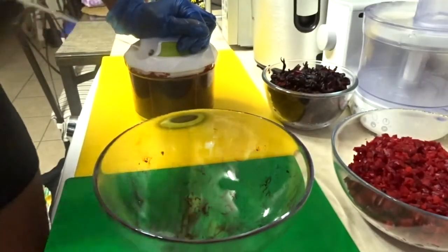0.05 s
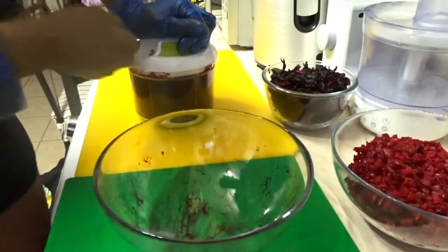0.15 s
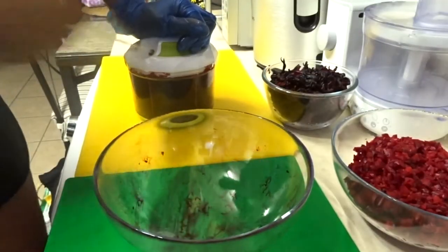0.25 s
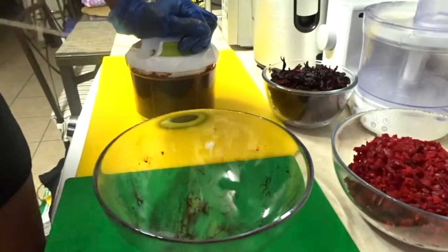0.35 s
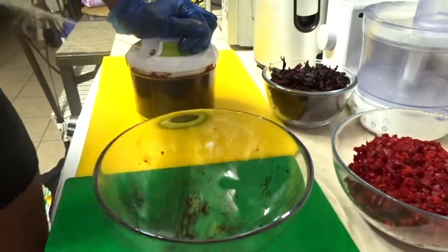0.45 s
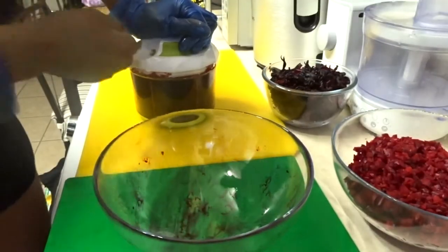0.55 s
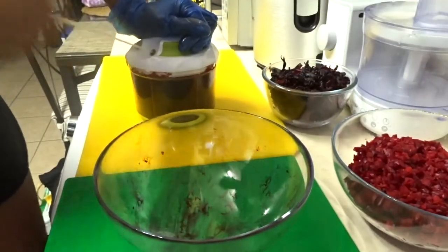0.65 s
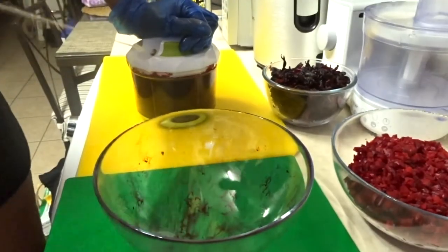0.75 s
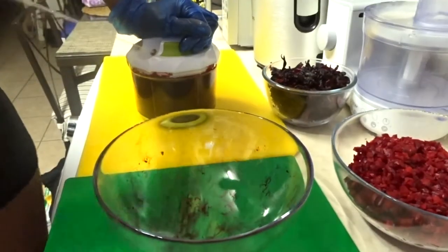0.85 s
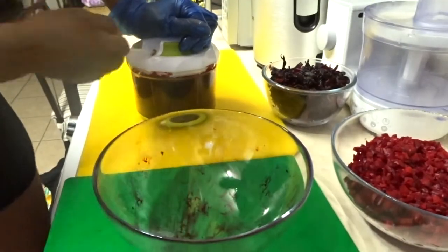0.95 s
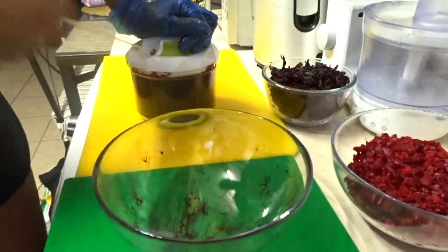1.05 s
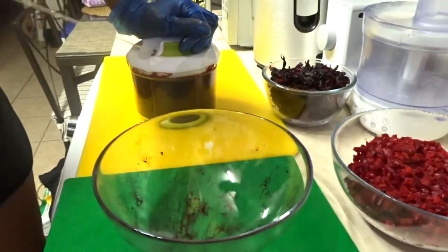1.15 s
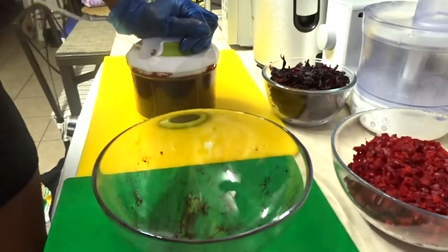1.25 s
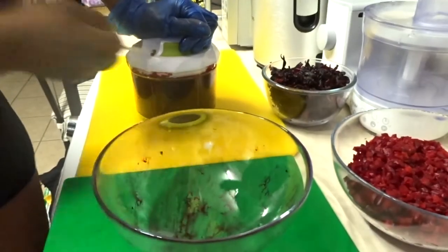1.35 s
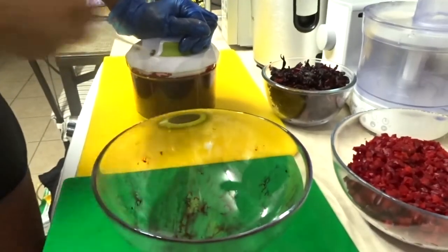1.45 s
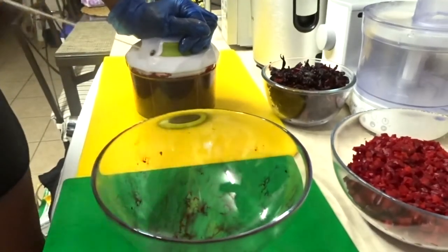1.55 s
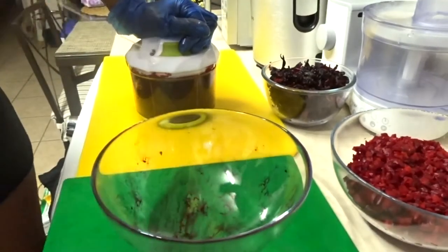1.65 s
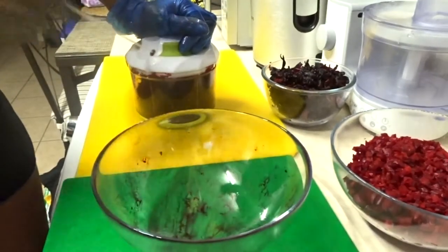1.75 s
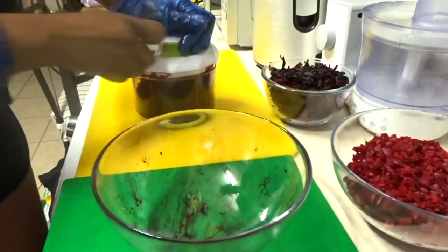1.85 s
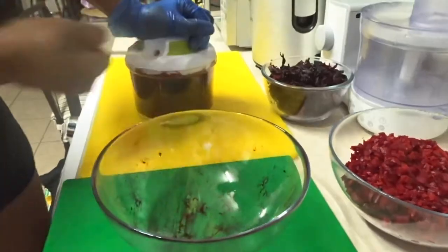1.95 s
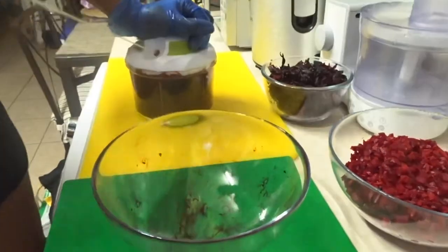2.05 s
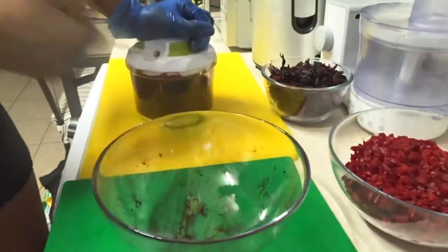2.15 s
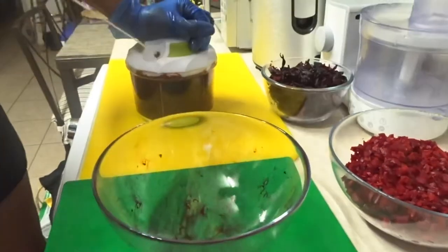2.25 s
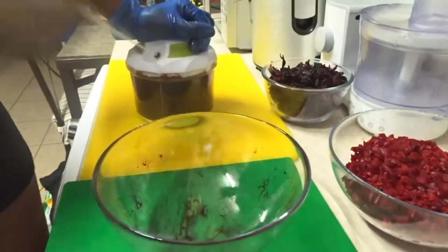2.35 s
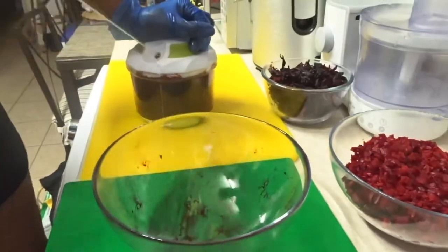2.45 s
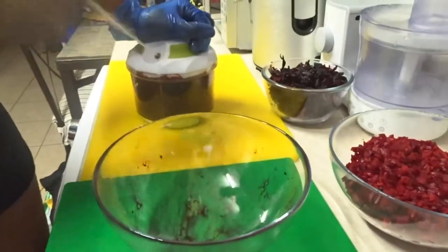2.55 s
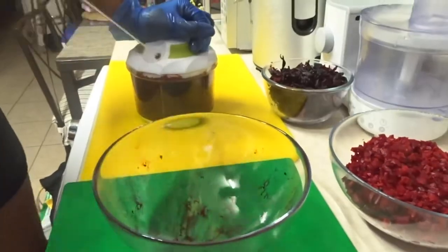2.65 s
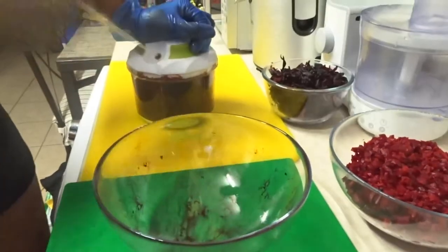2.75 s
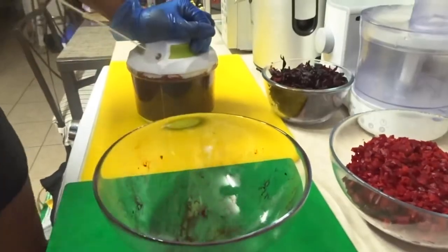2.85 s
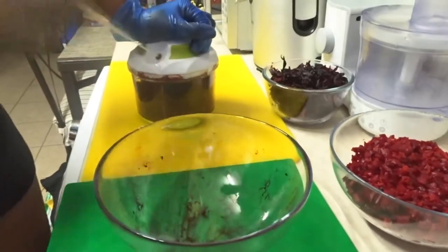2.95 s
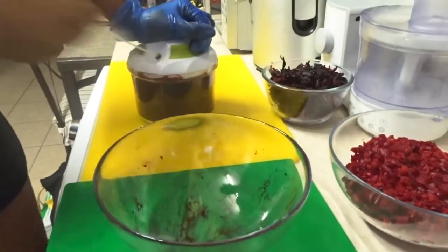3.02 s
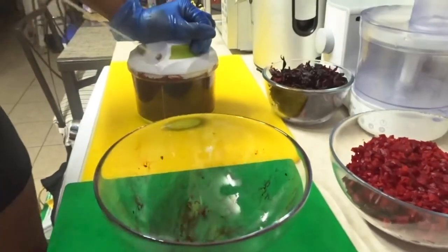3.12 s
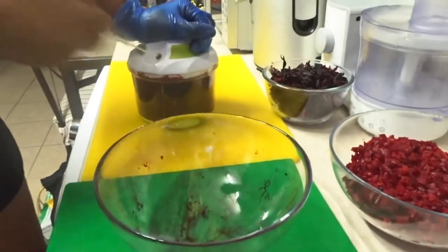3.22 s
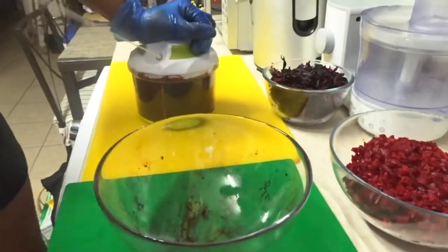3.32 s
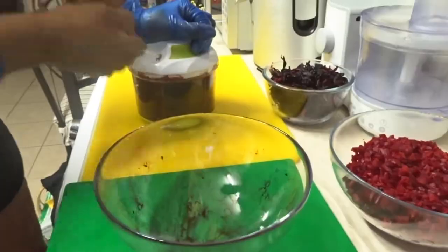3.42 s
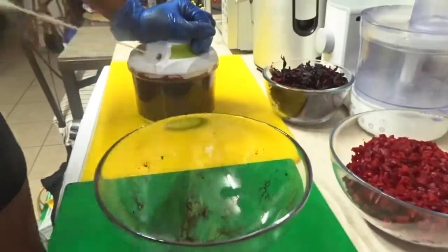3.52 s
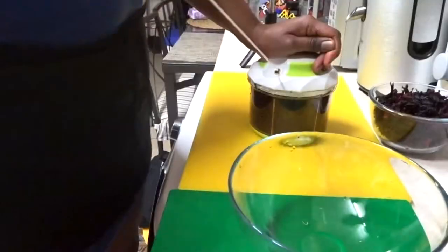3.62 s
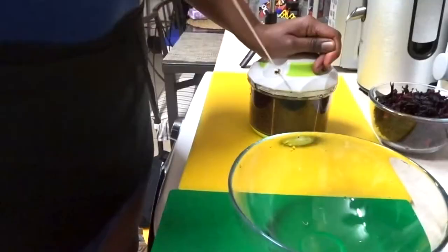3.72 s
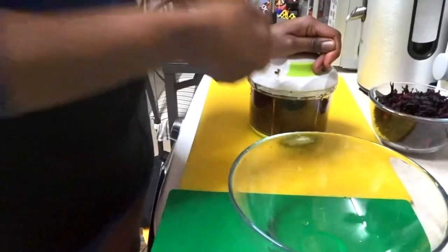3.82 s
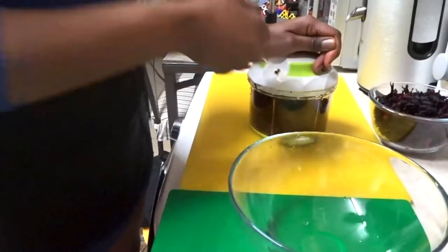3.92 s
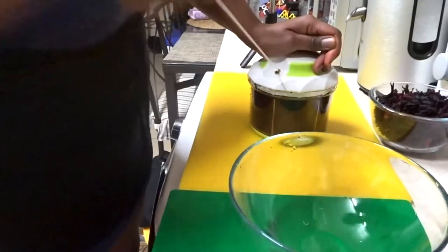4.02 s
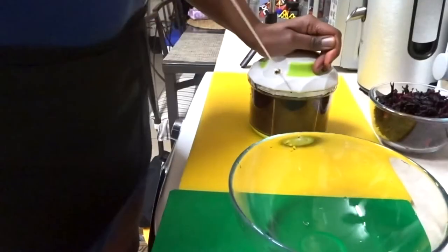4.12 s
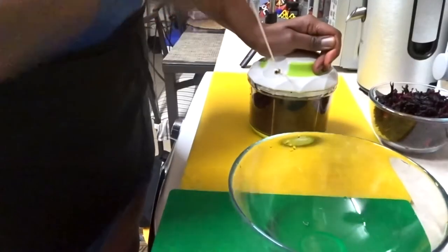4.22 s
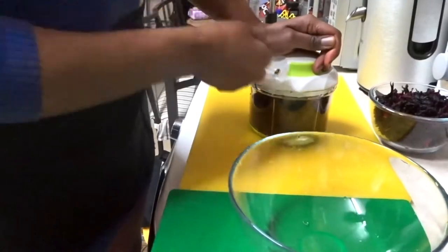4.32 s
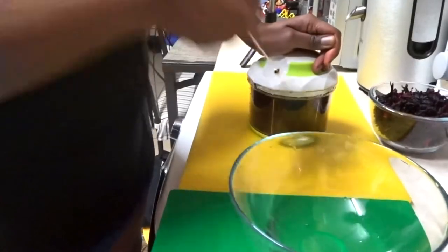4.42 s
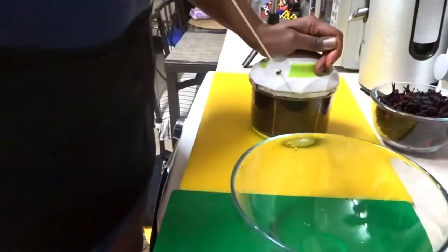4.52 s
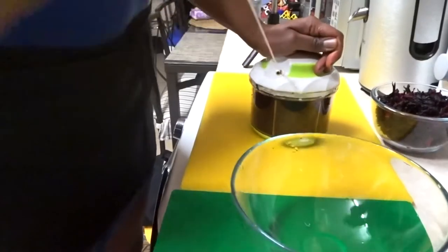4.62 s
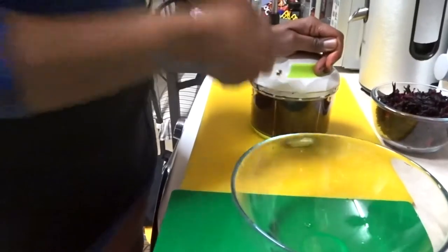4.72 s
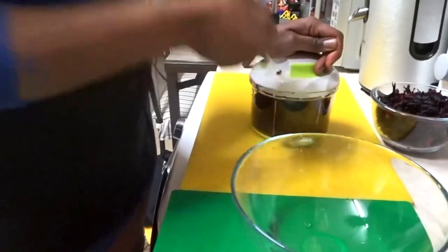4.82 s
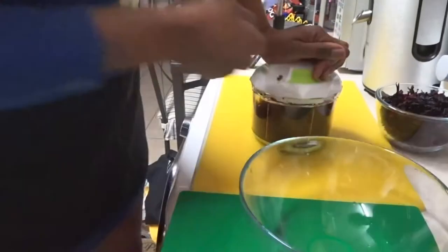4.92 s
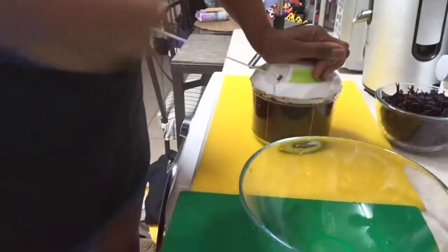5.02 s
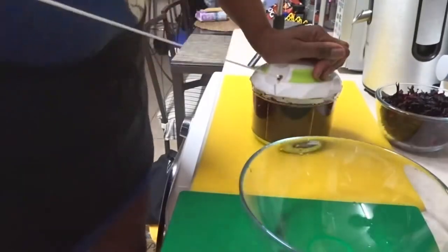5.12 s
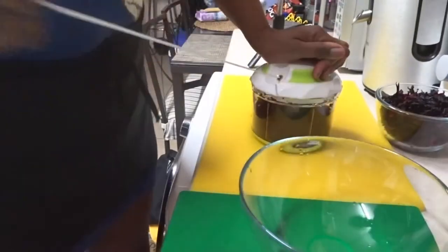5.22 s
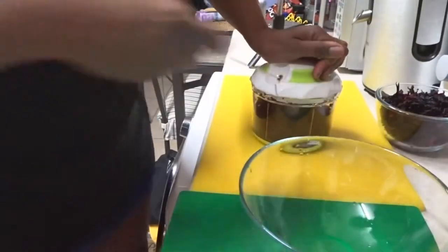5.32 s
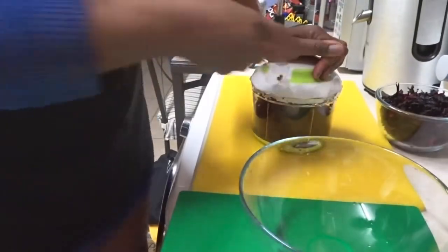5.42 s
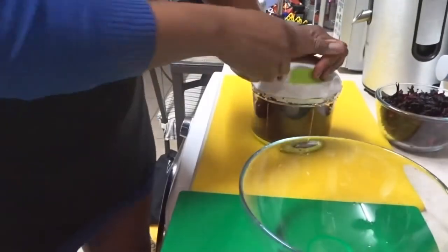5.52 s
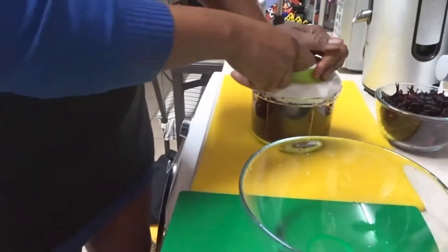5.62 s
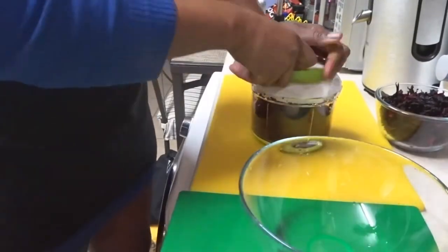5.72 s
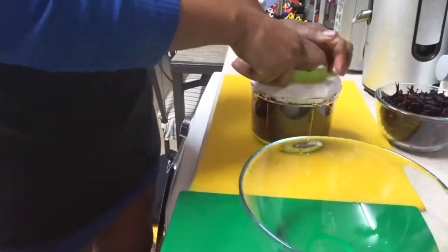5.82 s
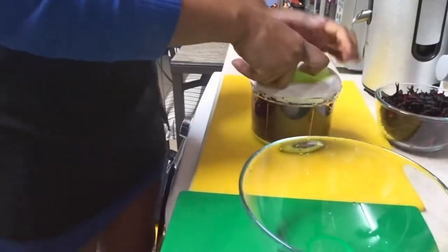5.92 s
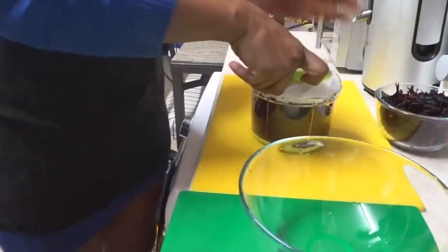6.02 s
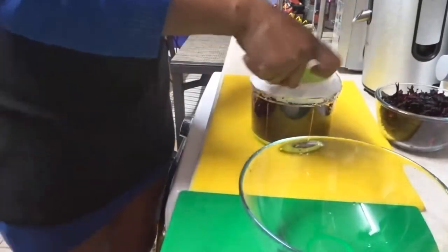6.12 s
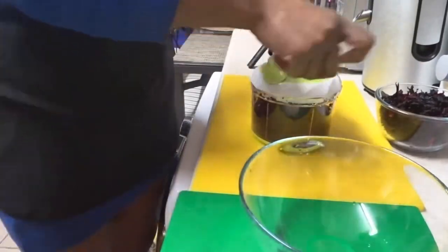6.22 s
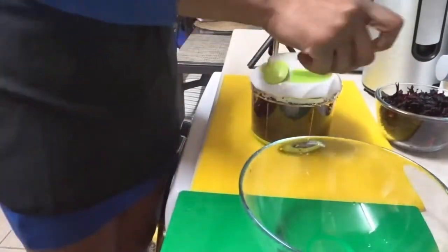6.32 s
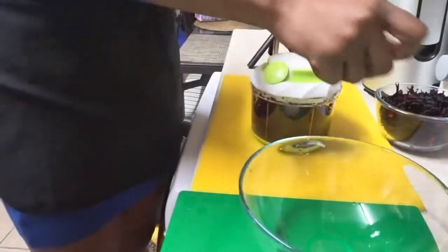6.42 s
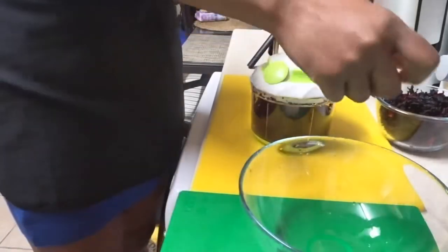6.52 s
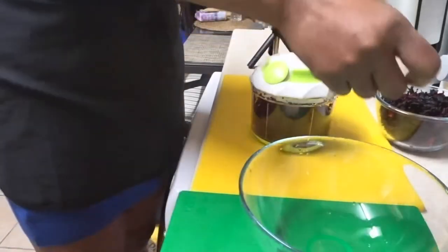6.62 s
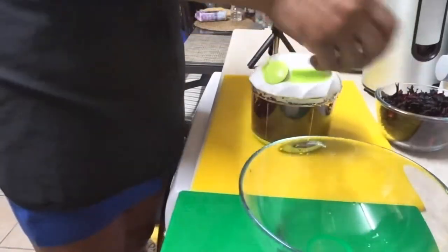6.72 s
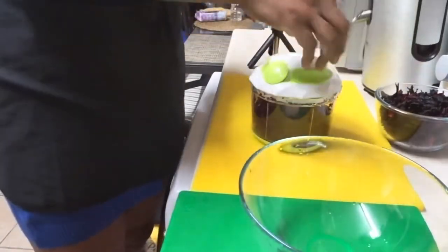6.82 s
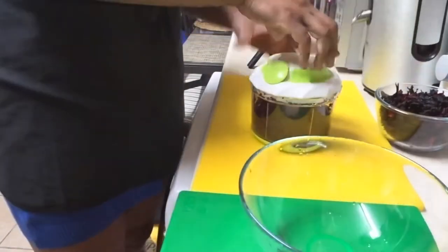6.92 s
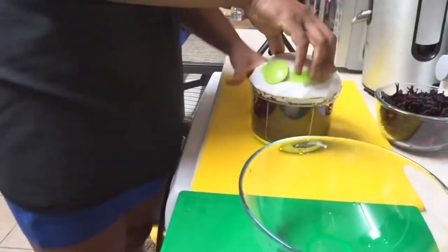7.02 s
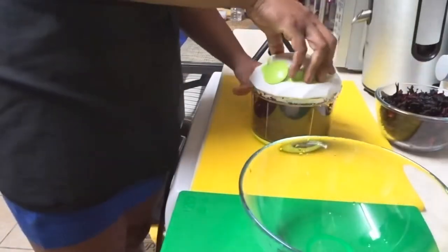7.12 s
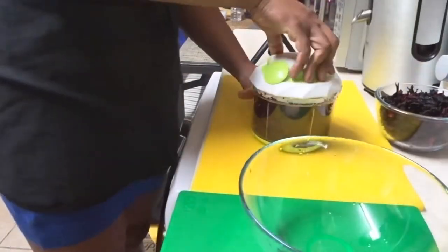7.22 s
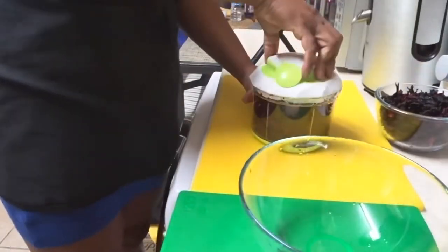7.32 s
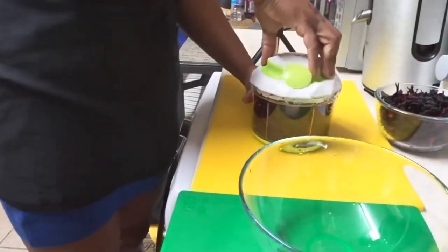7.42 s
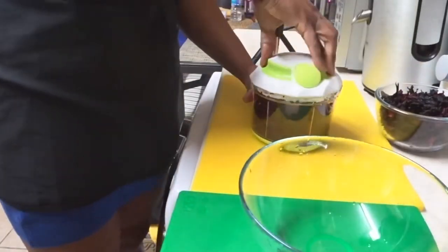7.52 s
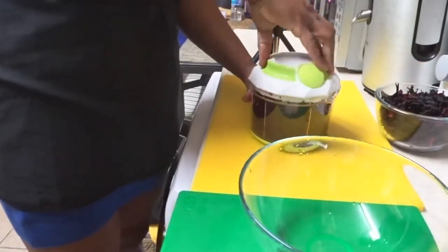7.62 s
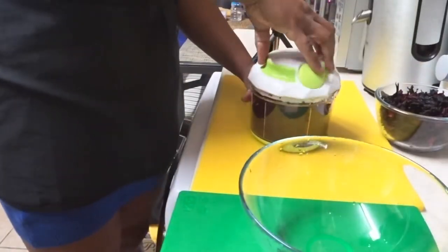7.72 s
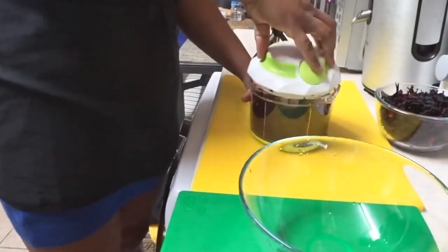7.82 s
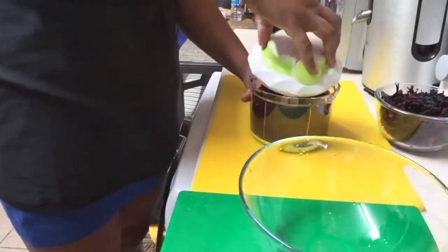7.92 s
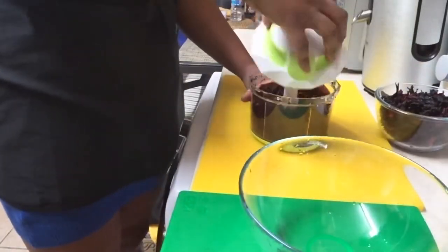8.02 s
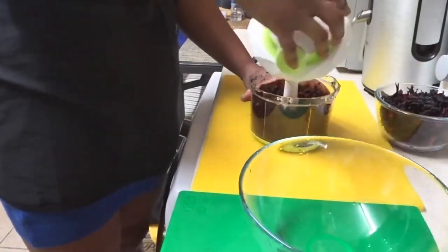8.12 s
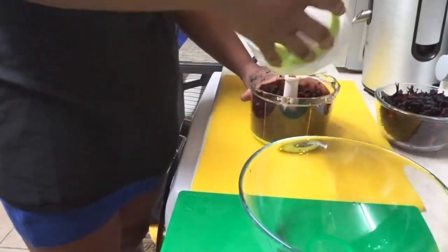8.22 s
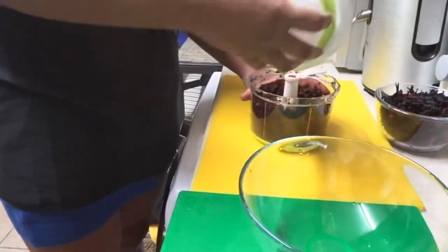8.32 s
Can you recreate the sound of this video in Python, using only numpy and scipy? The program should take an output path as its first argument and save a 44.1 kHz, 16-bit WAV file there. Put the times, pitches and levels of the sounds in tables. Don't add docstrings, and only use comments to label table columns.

```python
import sys
import numpy as np
from scipy import signal
from scipy.fft import rfft, irfft
from scipy.io import wavfile
from scipy.ndimage import uniform_filter1d

SR = 44100
rng = np.random.default_rng(int(sys.argv[2]) if len(sys.argv) > 2 else 0)


def dump_mix(stems):
    frames = np.atleast_2d(stems).T
    limited = np.clip(frames, -1, 1)
    pcm = np.round(limited * 32767).astype(np.int16)
    wavfile.write(sys.argv[1], SR, pcm)


def boost(x):
    u = np.asarray(x, float) / 20
    return 10 ** u


N = 368455
SIZE = 4096
HZ = np.fft.rfftfreq(SIZE, 1 / SR) + 1


def colour(points, modes=()):
    hz, db = np.transpose(points)
    lifts_db = sum(lift / (1 + (2 * (HZ - f) / width) ** 2) for f, width, lift in modes)
    return np.interp(np.log(HZ), np.log(hz), db) + lifts_db


def slope(lo_hz, hi_hz, order=3):
    return -10 * np.log10((1 + (lo_hz / HZ) ** (2 * order)) * (1 + (HZ / hi_hz) ** (2 * order)))


def response(db):
    cepstrum = irfft(db * np.log(10) / 20)
    cepstrum[1:SIZE // 2] *= 2
    cepstrum[SIZE // 2 + 1:] = 0
    return irfft(np.exp(rfft(cepstrum)))[:SIZE // 2]


def ring(x, db):
    return signal.oaconvolve(x, response(db))[:len(x)]


def unit(x):
    return x / np.sqrt(np.mean(x ** 2))


def walk(n, rate_hz):
    hold = int(SR / rate_hz)
    return uniform_filter1d(np.repeat(rng.standard_normal(n // hold + 1), hold)[:n], hold)


# (frequency [Hz], level [dB per Hz])
KITCHEN_HUSH = [(59, -62.5), (100, -35.5), (623, -14.5), (687, -11.5), (1120, -8.5), (2110, -2.5),
                (3060, -8.5), (5210, -9), (11000, -21), (14300, -51), (22000, -120)]
HUSH_DB = -63


def kitchen(n):
    noise = rng.standard_normal((2, n))
    hush = signal.fftconvolve(noise, response(colour(KITCHEN_HUSH))[None], axes=1)[:, :n]
    return boost(HUSH_DB) * unit(hush + 0.26 * hush[::-1])


def walls(t60_s=0.34, treble_t60_s=0.31, wet_db=-11):
    age_s = np.arange(SR // 2) / SR
    noise = rng.standard_normal((2, len(age_s)))
    dull = uniform_filter1d(noise, size=7, axis=1)
    wash = dull * boost(-60 * age_s / t60_s) + (noise - dull) * boost(-60 * age_s / treble_t60_s)
    wash = wash * np.minimum(age_s / 0.01, 1)
    return wash * boost(wet_db) / np.sqrt(np.sum(wash ** 2, axis=1, keepdims=True))


# (frequency [Hz], side minus mid [dB])
SIDE_COLOUR = [(100, -23), (300, -15.5), (700, -14.5), (1500, -8.5), (3000, -3.5), (6000, 3.5), (11000, -1)]


def room(x, wash, wander_hz=120):
    mid, side = signal.fftconvolve(x[None], wash, axes=1)[:, :len(x)]
    spots = ring(x * np.sin(3 * walk(len(x), wander_hz)), slope(350, 21000))
    side = ring(side + spots, colour(SIDE_COLOUR))
    return np.array([x + mid + side, x + mid - side])


def knocks(t, speed, events, body_db, gain_db):
    out = np.zeros(len(t) + SIZE)
    age_s = np.arange(SIZE // 2) / SR
    rattle = rng.standard_normal((len(events), SIZE // 2))
    for (s, db, hz, t60_s, focus), noise in zip(events, rattle):
        if t[0] <= s < t[-1]:
            blow = 0.24 * noise * boost(-60 * age_s / max(t60_s, .005))
            blow[0] = 1
            pitch_hz = hz / speed
            own_db = slope(pitch_hz / 1.48, pitch_hz * 1.1) + 8 / (1 + ((HZ - pitch_hz) / 120) ** 2)
            sound = ring(blow, 1.04 * body_db + focus * own_db)
            at = np.searchsorted(t, s)
            out[at:at + len(sound)] += boost(db + gain_db) * sound / np.abs(sound).max()
    return out[:len(t)]


# (peak [share of length], start below peak [dB], end below peak [dB],
# swell roundness [exponent], dying roundness [exponent], zizz steepness [ratio], zizz peak delay [share])
RUB_LAW = (0.12, 6.7, 37.3, 0.79, 0.85, 0.56, .01)
PUSH_LAW = (0.19, 5.9, 41.7, 2.4, 0.97, 0.82, .01)
DRIFT_LAW = (0.47, 10, 8.4, 1.1, 1.7, 1.75, 0.011)
# (start [s], length [s], chopping [dB], drumming above it [dB], zizz above it [dB])
HANDLE_SNAP = [
    (5.684, 0.13, -30, -6, -11.5),
    (5.73, .08, -39, -15, -15),
]
HANDLE_SEAT = [
    (5.833, 0.22, -15.5, -34.5, -10),
    (5.834, .06, -24, -35, -3),
]
HAND_AWAY = [
    (6.169, 0.29, -58, -36, 9),
    (6.298, 0.41, -52.5, -19, -1),
]
# (time [s], peak [dB], centre [Hz], T60 [s], focus on centre [0-1])
HANDLE_BLOWS = [
    (5.634, -30.5, 2260, 0.19, 0.31),
    (5.678, -2.5, 1600, 0.029, 0.51),
    (5.683, -17, 1300, 0.032, .4),
    (5.826, 2.5, 1910, 0.024, 0.3),
]
# (frequency [Hz], level [dB per Hz])
SLIDE_COLOUR = [(59, -91), (100, -57), (167, -52.5), (522, -18.5), (1080, -15.5), (1290, -6.5),
                (1670, -4.5), (3450, -2.5), (11000, -11), (14300, -54), (22000, -120)]
# (centre [Hz], width [Hz], lift [dB])
COUNTER_RESONANCES = [(389, 160, 14)]


def handle(t):
    snap_db = colour(ASIDE_COLOUR, [(1260, 300, 3), (1750, 300, 3), (3120, 580, 1.5)]) + slope(860, 3200)
    slide_db = colour(SLIDE_COLOUR, COUNTER_RESONANCES) + slope(420, 20000)
    out = chopper(t, [(RUB_LAW, HANDLE_SNAP)], snap_db)
    out += chopper(t, [(PUSH_LAW, HANDLE_SEAT), (DRIFT_LAW, HAND_AWAY)], slide_db, rough=.3, hiss=1.3)
    return out + knocks(t, 0.98, HANDLE_BLOWS, snap_db, -5.0)


# (frequency [Hz], level [dB per Hz])
LID_COLOUR = [(59, -91), (100, -28.5), (564, -5.5), (941, -7), (1600, -8), (1800, -10), (2890, -6),
              (11000, -25), (14300, -73), (22000, -120)]
# (centre [Hz], width [Hz], lift [dB])
SEATED_RESONANCES = [(407, 43, 2), (660, 69, 7.5), (1120, 90, 3.3), (1460, 100, 4), (1850, 90, 4),
                     (2100, 120, 10), (2520, 110, 6.3), (2840, 73, 3.4), (4200, 460, 5.6), (4800, 340, 5.2)]
LIFTED_RESONANCES = [(562, 93, 12), (1180, 120, 5.1), (1618, 90, 12.7), (2230, 90, 8.8), (2800, 290, 7.4),
                     (4050, 210, 11), (4770, 440, 1.3)]
# (start [s], length [s], chopping [dB], drumming above it [dB], zizz above it [dB])
LID_STROKES = [
    (6.963, 0.062, -43.5, -15, -8.5),
    (7.07, 0.12, -57.5, -26, -5),
    (7.174, 0.2, -23.5, -14.5, -11.5),
    (7.35, 0.24, -45.5, -7, -2.5),
    (7.362, .06, -43, -20, -2),
    (7.66, 0.19, -43, 1, -5),
    (7.778, 0.11, -23, -4, -15.5),
    (8.024, 0.072, -53.5, -11.5, -0.5),
]
LID_TWIST = [
    (7.45, 0.2, -51, -4.5, -6),
]
# (time [s], peak [dB], centre [Hz], T60 [s], focus on centre [0-1])
LID_BLOWS = [(6.962, -47, 1050, 0.06, 0.8), (7.08, -44, 2480, 0.06, 0.47), (7.168, -23, 2100, 0.067, 0.25),
             (7.176, -19, 1210, 0.045, 0.33), (7.18, -15.5, 2130, 0.064, 0.35), (7.185, -14, 3900, .04, .4),
             (7.186, -17, 660, 0.036, 0.27), (7.199, -13.5, 2100, 0.061, 0.86),
             (7.471, -45, 519, 0.037, 0.63), (7.494, -42, 565, 0.045, 0.58), (7.512, -32, 2550, .03, 0.98),
             (7.545, -43, 600, .03, .7), (7.59, -53, 620, .03, 0.57), (7.664, -42, 568, .04, 0.83),
             (7.278, -23, 2800, .05, .3), (7.283, -28.5, 600, 0.054, 0.36), (7.355, -44, 592, 0.046, 0.5),
             (7.378, -33, 2600, 0.04, 0.73), (7.509, -32.5, 600, 0.063, 0.12),
             (7.639, -43, 404, 0.026, 0.96), (7.685, -28.5, 2390, 0.06, 0.77), (7.691, -33, 2020, .05, .9),
             (7.697, -29, 1650, 0.053, 0.81), (7.706, -29, 1360, .05, 1), (7.715, -29, 1080, 0.04, 0.62),
             (7.776, -7, 2800, 0.02, 0.29), (7.777, -13, 4100, 0.014, 0.45), (7.782, -7, 1650, 0.034, 0.78),
             (7.786, -13, 1650, .02, 0.71), (7.802, -19, 1620, .04, 0.53), (8.026, -59, 2240, 0.06, 0.5)]
LIFT_S = 7.66


def lid(t):
    out = np.zeros(len(t))
    lifted = np.clip((t - LIFT_S) / .01 + 1, 0, 1)
    states = (SEATED_RESONANCES, 150, 1 - lifted), (LIFTED_RESONANCES, 400, lifted)
    for modes, low_hz, on in states:
        body_db = colour(LID_COLOUR, modes) + slope(low_hz, 19500)
        strokes = [(RUB_LAW, LID_STROKES), (DRIFT_LAW, LID_TWIST)]
        rubs = chopper(t, strokes, body_db, rough=0.57, hiss=.9)
        out += on * (rubs + knocks(t, 1.0, LID_BLOWS, body_db, -2.1))
    return out


# (time [s], peak [dB], centre [Hz], focus on centre [0-1])
CLUTCH_CATCHES = [(.108, 0, 1480, 0.28), (.139, -3.5, 2480, 0.15), (.319, -6.5, 1490, 0.38),
                  (.501, -4.5, 1380, 0.25), (0.74, -4, 2110, 0.33), (1.13, -11, 2790, 0.67),
                  (1.158, -4.5, 2100, 0.38), (1.328, -8, 1006, 0.21), (1.551, -6.5, 1380, 0.36),
                  (2.116, -10.5, 1500, 0.8), (2.238, -15, 800, 0.46), (2.317, -2.5, 2740, 0.3),
                  (2.52, -20, 1600, 0.4), (2.635, -17, 3280, 0.8), (2.718, -9, 1595, 1),
                  (2.836, -5.5, 1060, 0.22), (2.925, -9, 2980, 0.3), (3.132, -3, 2800, 0.3),
                  (3.03, -13, 1500, 0.6), (3.249, -9, 1500, 0.16), (3.356, -20, 2850, 0.3),
                  (3.452, -3, 3000, 0.05), (3.383, 0.5, 5300, 1), (3.816, -2, 1240, 0.29),
                  (4.268, -4, 1458, 0.49), (4.325, -8, 1440, 0.08), (4.707, -7, 1230, 0.17),
                  (4.989, -5.5, 3770, 1)]
# (time [s], peak [dB], centre [Hz], focus on centre [0-1])
CLUMP_KNOCKS = [(.354, -17, 2160, 0.2), (.766, -6.5, 2170, 0.2), (.957, -6, 2160, 0.5),
                (1.324, -16, 5500, 0.2), (1.379, -4.5, 2170, 0.46), (1.423, -7, 2170, 0.5),
                (1.582, -13, 1400, 0.2), (1.615, -9, 3420, 0.3), (1.995, -2, 5600, .4),
                (2.127, -7, 3000, .3), (2.226, -8, 3000, 0.1), (2.428, -11, 3000, 0.4),
                (3.224, -6, 3000, 0.26), (3.504, -20, 3030, .3)]
# (time [s], peak [dB], centre [Hz], T60 [s], focus on centre [0-1])
CORD_STOP = [
    (1.864, -3.5, 2800, 0.11, 0.68),
    (1.869, -4, 2095, 0.12, 1),
]
CLUTCH_T60_S = 0.056


def clutch(t, speed, bowl_db):
    events = [(s, db, hz, CLUTCH_T60_S, focus) for s, db, hz, focus in CLUTCH_CATCHES + CLUMP_KNOCKS]
    return knocks(t, speed, events + CORD_STOP, bowl_db, -3.0)


# (frequency [Hz], level [dB per Hz])
NEAR_COLOUR = [(59, -69), (100, -26), (313, -9.5), (396, -5), (492, -3.5), (576, -3.5), (2780, -3),
               (6340, -6.5), (11000, -3.5), (14300, -58), (22000, -120)]
ASIDE_COLOUR = [(59, -69), (100, -41.5), (599, -9), (923, -7.5), (1420, -1), (1730, -7.5), (2030, -1),
                (3310, -4), (11000, -7), (14300, -61), (22000, -120)]
# (centre [Hz], width [Hz], lift [dB])
BOWL_RESONANCES = [(215, 40, 6), (600, 70, 4), (805, 80, 4), (1225, 90, 6), (1480, 130, 6), (1985, 90, 5),
                   (2180, 100, 4), (2440, 90, 3), (4060, 100, 4)]
FACING_RESONANCES = [(403, 45, 6), (2820, 190, 6)]
NEAR_FREE_RESONANCES = [(450, 140, 6), (912, 190, -3), (1200, 180, -5), (1650, 110, 8), (3180, 620, -4.5),
                        (3510, 83, 8)]
ASIDE_FREE_RESONANCES = [(1331, 110, 2), (2100, 200, 3), (3320, 270, -4.5), (6450, 1500, -2),
                         (5500, 250, 7), (4650, 100, 5.5), (3610, 100, 0.5), (8450, 1700, 4)]
PRESSED_RESONANCES = [(600, 320, 1.5), (1000, 380, -0.5), (1480, 280, 1.5), (2100, 270, -0.5),
                      (2800, 400, 0), (3620, 1200, 0)]


def bowl_bodies(near, pressed):
    points = NEAR_COLOUR if near else ASIDE_COLOUR
    modes = BOWL_RESONANCES + FACING_RESONANCES if near else BOWL_RESONANCES
    free_modes = NEAR_FREE_RESONANCES if near else ASIDE_FREE_RESONANCES
    press_db = colour([(100, 0), (200, 0)], PRESSED_RESONANCES) if pressed else 0
    return colour(points, modes) + press_db, colour(points, modes + free_modes) + press_db


# (peak [share of length], start below peak [dB], end below peak [dB],
# swell roundness [exponent], dying roundness [exponent], zizz steepness [ratio], zizz peak delay [share])
BRISK_PULL_LAW = (0.1, 3.5, 11.5, 3, 0.5, 1.5, 0)
BRISK_RETURN_LAW = (0.31, 13, 14.7, 2.4, 1.9, 1.18, 0.086)
FAST_PULL_LAW = (0.5, 8.5, 15.5, 2, 1, 0.8, -0.3)
FAST_RETURN_LAW = (0.41, 12.6, 19, 2.25, 1.43, 0.98, 0.13)
BITE_LAW = (0.2, 5.9, 11.1, 1.5, 2.1, 1.2, .01)
LAST_LAW = (.7, 6.7, 12, 1.4, 1.1, 1.1, .01)
# (start [s], length [s], chopping [dB], drumming above it [dB], zizz above it [dB])
BRISK_PULLS = [(.108, 0.24, -22, -6, -12), (0.495, 0.23, -17, -9.5, -19), (.932, 0.2, -20, -15, -14),
               (1.33, 0.19, -23, -12.5, -15), (1.937, 0.098, -18, -10, -6), (2.117, 0.11, -17, -11, -8),
               (2.318, 0.11, -16.5, -15, -13), (2.522, 0.13, -16, -10, -11), (2.717, 0.12, -16, -11.5, -9),
               (2.926, 0.11, -17, -10, -6.5), (3.136, 0.12, -16.5, -13.5, -8),
               (3.356, 0.12, -23, -7.5, -4.5)]
BRISK_RETURNS = [(-.06, 0.15, -19, -7, 3), (0.352, 0.13, -17, -7.5, 2), (0.744, 0.16, -19, -6.5, 0.2),
                 (1.165, 0.16, -18.5, -7, 0.5), (1.567, 0.25, -24, -9.5, 1), (2.04, 0.075, -22, -8.5, 3.5),
                 (2.237, 0.076, -17, -8.5, 1), (2.439, 0.083, -16.5, -10.5, -1.5),
                 (2.636, 0.079, -16.5, -8, -0.5), (2.836, 0.087, -18, -7.5, 1.5),
                 (3.043, 0.11, -20, -11.5, 0), (3.251, 0.13, -23.5, -7.5, 2)]
BRISK_BITES = [(.14, 0.18, -16, -13, -12.5), (0.518, 0.18, -16, -17, -14.5),
               (.574, 0.076, -24.5, -13.5, -1), (0.956, 0.15, -15, -12, -12.5),
               (0.984, 0.086, -24, -13, -0.5), (1.375, 0.14, -16, -14.5, -21),
               (1.43, 0.081, -18.5, -9, -7.5), (1.945, 0.041, -18.5, -13, -11),
               (2.135, 0.085, -20.5, -12.5, -15), (2.339, 0.079, -19, -9, -6), (2.542, 0.057, -17, -12, 2),
               (2.729, .07, -22, -13, -3), (2.94, .07, -21.5, -19, -14), (3.16, .075, -24.5, -10.5, -7),
               (3.383, 0.078, -19.5, -11, -4)]
BRISK_FREE_BITES = [(.767, 0.1, -26.5, -16.5, 2), (1.19, 0.11, -28.5, -11, 0),
                    (1.616, 0.066, -19, -9, -7.5), (3.051, 0.038, -22, -6.5, -4)]
BRISK_LAST_BITES = [(0.243, 0.058, -21, -9, -9.5), (0.617, 0.064, -18, -12.5, -16),
                    (1.038, 0.056, -19, -15, -15), (1.464, 0.063, -23, -8, -13.5),
                    (2.165, 0.044, -15, -10, -11), (2.365, 0.052, -19, -11.5, -15),
                    (2.575, 0.047, -21, -11, -14), (2.762, .05, -21.5, -8, -11),
                    (2.973, 0.058, -20, -9, -9), (3.181, 0.058, -21, -8.5, -7),
                    (3.413, 0.058, -26, -10, -9)]
CORD_STOP_RUBS = [
    (1.866, 0.21, -29, -28, -5.5),
    (1.9, 0.12, -36.5, -26, -10),
    (3.48, 0.32, -33.5, -8, -11),
]


def brisk_strokes(fast):
    pull_law = FAST_PULL_LAW if fast else BRISK_PULL_LAW
    return_law = FAST_RETURN_LAW if fast else BRISK_RETURN_LAW
    pulls = [(pull_law, BRISK_PULLS), (BITE_LAW, BRISK_BITES), (LAST_LAW, BRISK_LAST_BITES)]
    returns = [(return_law, BRISK_RETURNS), (RUB_LAW, CORD_STOP_RUBS), (BITE_LAW, BRISK_FREE_BITES)]
    return pulls, returns


# (peak [share of length], start below peak [dB], end below peak [dB],
# swell roundness [exponent], dying roundness [exponent], zizz steepness [ratio], zizz peak delay [share])
SLOW_PULL_LAW = (0.14, 5.5, 16.5, -0.2, 3, 1.1, -1)
SLOW_RETURN_LAW = (0.45, 17.3, 15.4, 2.9, 1.68, 0.97, .06)
SPIN_DOWN_LAW = (0.24, 10.5, 28.5, 2.4, 0.96, 1.3, 0.016)
# (start [s], length [s], chopping [dB], drumming above it [dB], zizz above it [dB])
LATE_PULLS = [(3.815, 0.27, -23, -5, -16.5), (4.268, 0.26, -21.5, -5.5, -12), (4.707, 0.18, -23.5, -4, -16),
              (4.849, 0.23, -20.5, -3, -22)]
LATE_RETURNS = [(3.5, 0.12, -26, -2.5, -10), (3.608, 0.2, -22, -9, -4.5), (4.083, .18, -19, -8, -6),
                (4.516, 0.2, -22, -12.5, -7)]
LATE_BITES = [(3.888, 0.053, -20, -9.5, -7), (3.944, 0.046, -18, -6.5, -7), (4.325, 0.046, -27, -2.5, -7),
              (4.77, 0.089, -18.5, -16.5, -15.5), (4.874, 0.13, -23, -12.5, -11.5),
              (4.988, .04, -28.5, 10, -12)]
LATE_FREE_BITES = [(3.62, 0.079, -36, 4.5, -9), (3.68, 0.081, -25.5, -3.5, -12),
                   (4.113, 0.055, -25, -20, -10), (4.59, 0.097, -24, -7.5, -3.5),
                   (5.129, 0.063, -34.5, -5, -12)]
LATE_LAST_BITES = [(3.97, 0.047, -27, -1, -14), (4.39, 0.066, -24.5, -4, -10),
                   (4.79, 0.045, -24.5, -4.5, -17.5), (5.0, .05, -30.5, -1, -17)]
BLADE_COAST = [
    (5.1, 0.53, -25.5, -8, -1.7),
]


def slow_strokes():
    pulls = [(SLOW_PULL_LAW, LATE_PULLS), (BITE_LAW, LATE_BITES), (LAST_LAW, LATE_LAST_BITES)]
    returns = [(SLOW_RETURN_LAW, LATE_RETURNS), (SPIN_DOWN_LAW, BLADE_COAST), (BITE_LAW, LATE_FREE_BITES)]
    return pulls, returns


CATCH_S, DRUM_STEEPNESS, CHOP_STEEPNESS = .015, 0.82, 0.97


def efforts(table):
    rows = [(*law, *row) for law, strokes in table for row in strokes]
    columns = np.transpose(rows)[:, :, None]
    peak, rise_db, fall_db, swell, dying, steep, late = columns[:7]
    start, length, chop_db, drum_db, zizz_db = columns[7:]
    catches = np.transpose(CLUTCH_CATCHES)[0]
    catch = catches[np.argmin(np.abs(start - catches), axis=1), None]
    start = np.where(np.abs(catch - start) < CATCH_S, catch, start)
    s = np.arange(start.min(), (start + 2 * length).max(), .001)
    age = (s - start) / length

    def layer(above_db, steepness, peak):
        peak = np.clip(peak, .02, .9)
        rise = rise_db * np.abs(1 - age / peak) ** swell
        fall = fall_db * np.abs((age - peak) / (1 - peak)) ** dying
        lack_db = np.where(age < peak, rise, fall)
        power = (age >= 0) * boost(2 * (chop_db + above_db - steepness * lack_db))
        return 10 * np.log10(np.sum(power, axis=0) + 1e-12)

    drum = layer(drum_db, DRUM_STEEPNESS, peak)
    return s, drum, layer(0, CHOP_STEEPNESS, peak), layer(zizz_db, steep, peak + late)


def grains(n, rate_hz, scatter_db, hiss):
    size = boost(scatter_db * np.minimum(rng.exponential(size=n), 3))
    impacts = (rng.random(n) < rate_hz / SR) * rng.choice([-1, 1], n) * size
    return unit(impacts) + hiss * rng.standard_normal(n)


def drumming(n, body_db):
    return boost(2 * walk(n, 50)) * ring(grains(n, 500, 4.6, 0.76), body_db + slope(16, 726))


ZONES_HZ = [1100, 1750, 2500]
FLEX = .025


def chopping(n, body_db, rough, hiss):
    hits = boost(rough * 1.8 * walk(n, 250)) * grains(n, 1000, rough * 2.7, hiss)
    cracks = ring(hits, body_db + slope(610, 3500, order=2))
    cracks = np.interp(np.cumsum(1 + FLEX * walk(n, 7)), np.arange(n), cracks, period=n)
    below = [signal.sosfilt(signal.butter(3, hz, fs=SR, output="sos"), cracks) for hz in ZONES_HZ]
    zones = np.diff([0 * cracks, *below, cracks], axis=0)
    return sum(boost(rough * 1.5 * walk(n, 70) + .9 * walk(n, 8)) * zone for zone in zones)


def zizzing(n, body_db, teeth, ping_db):
    hits = boost(1.9 * walk(n, 130)) * grains(n, 3500, 2.0, 0.51)
    teeth_db = colour([(100, 0.0055), (20000, 0.0017)], teeth)
    zizz = unit(ring(hits, body_db + teeth_db + slope(3600, 18000)))
    if ping_db is not None:
        steel_db = colour([(100, 0), (200, 0.004)], teeth) + slope(8300, 13000, order=5)
        zizz = zizz + boost(ping_db) * unit(ring(grains(n, 150, 5.2, 0), steel_db))
    return zizz


def chopper(t, table, body_db, teeth=(), ping_db=None, rough=1, hiss=0.63):
    s, *effort = efforts(table)
    on = (t >= s[0]) & (t <= s[-1])
    n = on.sum()
    drum_db, chop_db, zizz_db = (np.interp(t[on], s, np.maximum(e, -95)) for e in effort)
    out = np.zeros(len(t))
    out[on] = boost(drum_db - 1.3) * unit(drumming(n, body_db))
    out[on] += boost(chop_db - 1.04) * unit(chopping(n, body_db, rough, hiss))
    out[on] += boost(zizz_db - 1.3) * zizzing(n, body_db, teeth, ping_db)
    return out


LIMIT_DB, LIMIT_RATIO, LIMIT_S = -16.5, 2.4, .006


def limited(x):
    size = int(SR * max(LIMIT_S, .001))
    loud_db = 10 * np.log10(uniform_filter1d(np.mean(x ** 2, axis=0), size=size) + 1e-12)
    cut_db = np.maximum(loud_db - LIMIT_DB, 0) * (1 - 1 / max(LIMIT_RATIO, 1))
    return x * boost(-uniform_filter1d(cut_db, size=size))


TOP, KNEE, MIC_LOW_HZ, MIC_TOP_HZ = .53, 6, 150, 11050


def microphone(x):
    x = limited(x)
    x = x / (1 + np.abs(x / TOP) ** KNEE) ** (1 / KNEE)
    x = signal.sosfilt(signal.butter(1, MIC_LOW_HZ, "high", fs=SR, output="sos"), x)
    return signal.sosfilt(signal.ellip(12, .2, 90, MIC_TOP_HZ, fs=SR, output="sos"), x)


# (centre [Hz], width [Hz], lift [dB])
RATCHET_RESONANCES = [(4354, 200, 8.7), (4540, 90, 4.2), (5810, 95, 6), (7340, 60, 5), (7860, 140, 7.5),
                      (8050, 80, 3.7), (8700, 60, 4), (8560, 66, 6), (8860, 85, 5.6), (9250, 94, 6.8),
                      (9620, 49, 13), (10440, 50, 6), (10720, 92, 9.1)]
PING_DB = -4.5


def shot(t, speed, pulls, returns, wash):
    bowl_db, free_db = bowl_bodies(near=t[-1] < STRETCHES[2][0], pressed=speed > 1)
    dry = chopper(t, pulls, bowl_db, RATCHET_RESONANCES[2:], PING_DB)
    dry += chopper(t, returns, free_db, RATCHET_RESONANCES, rough=0.67, hiss=0.99)
    dry += clutch(t, speed, bowl_db)
    if t[-1] > LIFT_S:
        dry += handle(t) + lid(t)
    return microphone(room(dry, wash) + kitchen(len(t)))[:, ::speed]


# (start [s], end [s], fade in [s], fade out [s])
STRETCHES = [
    (0, 1.92, .001, .03),
    (1.92, 3.525, .015, .002),
    (3.525, 4.855, .012, .02),
    (4.855, 8.36, .012, .001),
]
BALANCE_DB = [-0.71, -0.24, -0.74, -0.95]


def scene():
    out, wash = np.zeros((2, N)), walls()
    speeds = 1, 2, 1, 1
    strokes = brisk_strokes(fast=False), brisk_strokes(fast=True), slow_strokes(), slow_strokes()
    for (t0, t1, rise, fall), pan_db, speed, table in zip(STRETCHES, BALANCE_DB, speeds, strokes):
        a, b = int(t0 * SR), min(int(t1 * SR), N)
        t = np.arange(a, b) / SR
        fade = np.clip((t - t0) / rise, 0, 1) * np.clip((t1 - t) / fall, 0, 1)
        slow_t = (a + np.arange((b - a) * speed) / speed) / SR
        pan = boost(np.array([[pan_db], [-pan_db]]) / 2)
        out[:, a:b] = shot(slow_t, speed, *table, wash) * fade * pan
    return out


def low_pass(x):
    return signal.sosfilt(signal.butter(12, 17110, fs=SR, output="sos"), x)


def record(dry):
    mix = signal.sosfilt(signal.ellip(12, .2, 90, 15850, fs=SR, output="sos"), dry)
    return low_pass(mix)


dry = scene()
out = record(dry)
dump_mix(out)
```